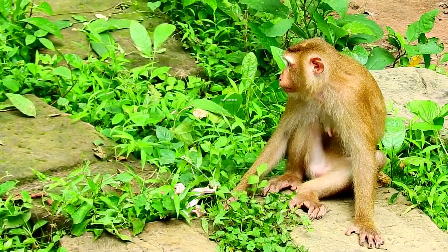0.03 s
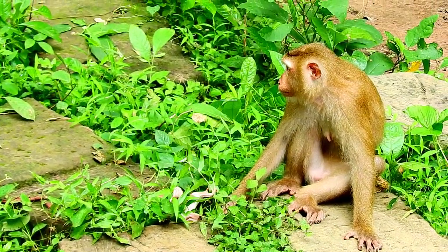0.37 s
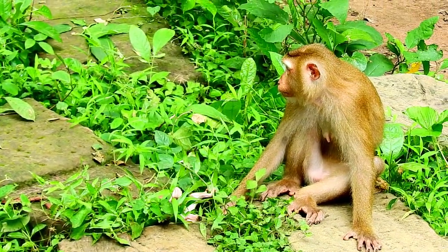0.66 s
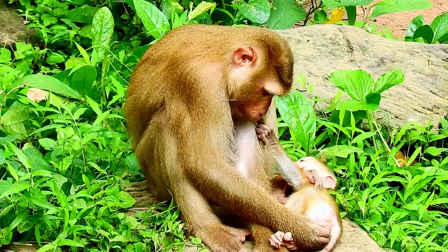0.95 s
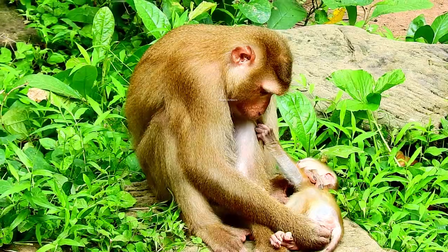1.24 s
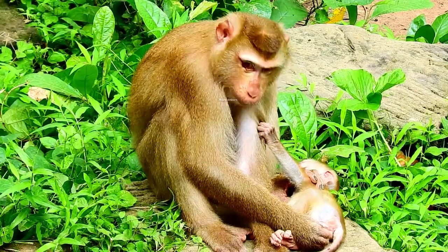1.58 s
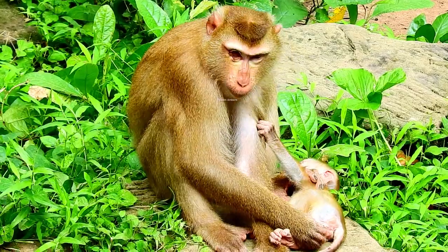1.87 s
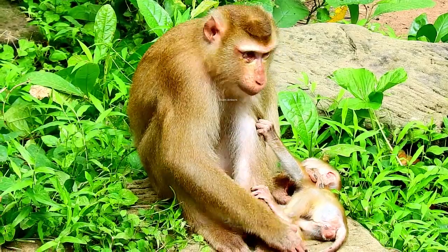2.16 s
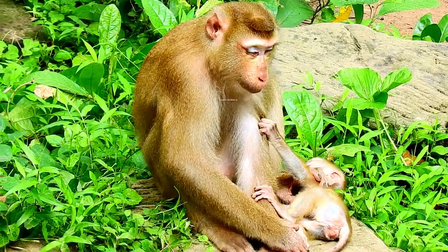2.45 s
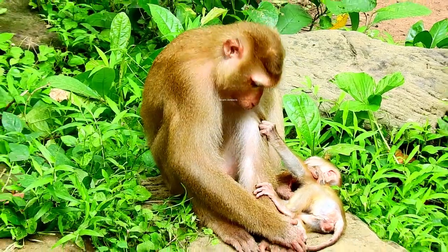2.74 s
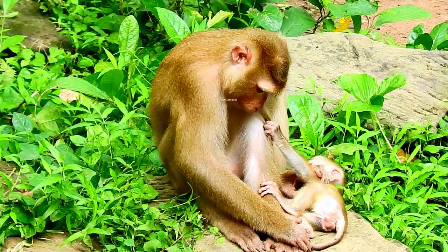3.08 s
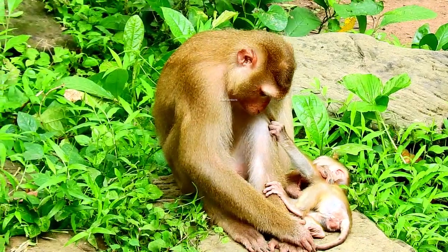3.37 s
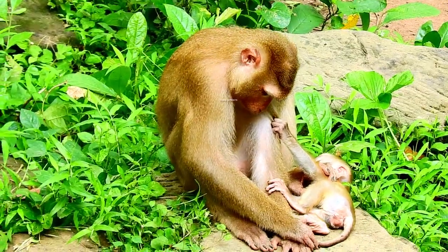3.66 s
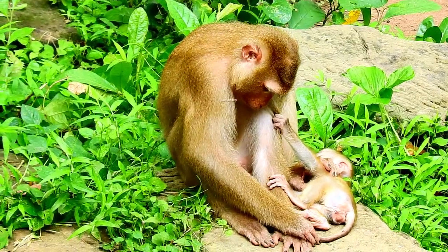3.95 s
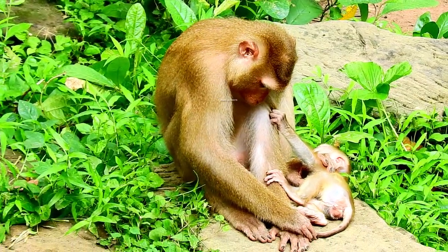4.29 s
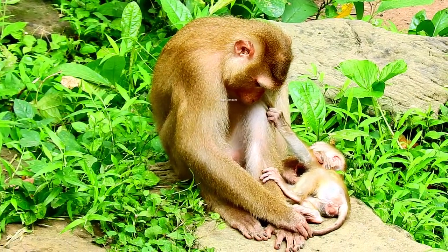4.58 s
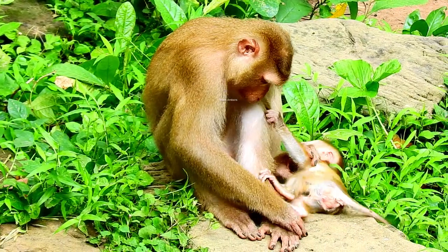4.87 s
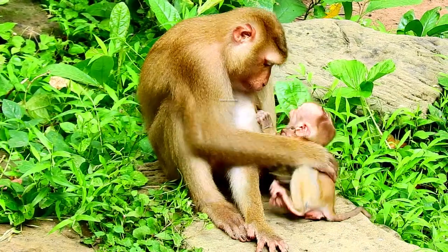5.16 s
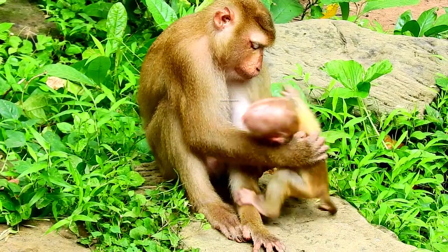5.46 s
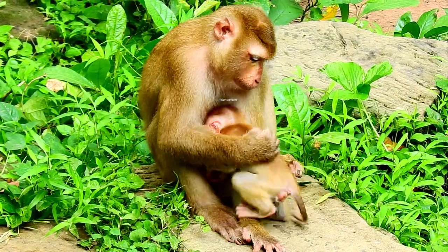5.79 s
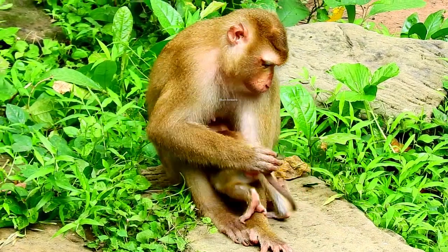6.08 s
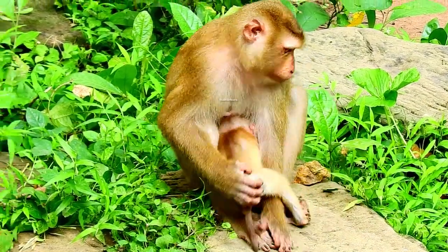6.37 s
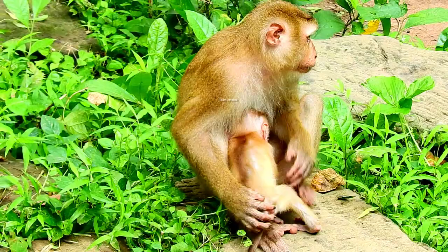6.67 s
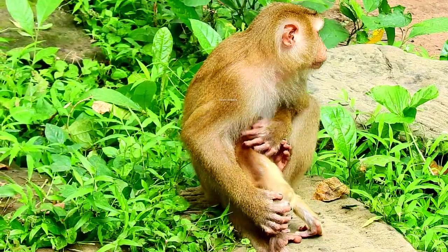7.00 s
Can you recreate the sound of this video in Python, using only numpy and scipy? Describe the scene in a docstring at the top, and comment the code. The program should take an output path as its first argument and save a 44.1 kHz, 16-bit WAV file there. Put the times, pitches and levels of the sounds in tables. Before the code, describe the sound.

Sharp chirps and soft whimpers from a young monkey build to hoarse screams and squeals over a steady outdoor hiss.

```python
"""Baby monkey in a clearing

Sharp chirps break into barks; soft grunts and a rising coo follow, then screams and two wails.
Vocal folds are the source and the throat is the filter: periodic vibration gives a whistle, irregular
pulses a rasp, and the screams flip between the two. Trees and stones scatter the calls over a steady
outdoor hiss. Early on, the sound cuts once from one spot to another."""
import sys
import numpy as np
from scipy import signal
from scipy.fft import rfft, irfft, next_fast_len
from scipy.io import wavfile
from scipy.ndimage import uniform_filter1d, minimum_filter1d, map_coordinates

SR = 44100
rng = np.random.default_rng(int(sys.argv[2]) if len(sys.argv) > 2 else 0)


def wav_record(signal):
    """Record a signal, one row per channel, as 16-bit PCM in the file named by sys.argv[1]."""
    frames = np.transpose(np.atleast_2d(signal))
    bounded = np.clip(frames, -1, 1)
    # unit amplitude maps onto the largest positive 16-bit level
    quanta = np.round(bounded * 32767).astype(np.int16)
    wavfile.write(sys.argv[1], SR, quanta)


N = 310023

# Spectrum of the outdoor background: f/Hz, relative level/dB
AIR_SPECTRUM = [(20, -50), (46, -10.5), (75, -11.5), (260, -15.5), (700, -22), (3500, -27), (6300, -28),
                (8000, -41), (11000, -47), (15500, -59)]
# Coherence of the background between the ears: f/Hz, left-right correlation
AIR_COHERENCE = [(100, 0.99), (4000, 0.8), (9000, 0.043)]
# Contours, one for each coo: t/s, pitch/Hz, level/dB, overtones re fundamental/dB
COO_CONTOURS = [
    [(0.0, 1080, -35.5, -11), (0.076, 1180, -43, -23), (0.11, 1147, -54.5, 3.5)],
    [(3.09, 780, -48.5, -10), (3.124, 1055, -36.5, -3), (3.194, 1029, -37, -6.5), (3.268, 1127, -29, -22),
     (3.334, 1166, -32, -22), (3.362, 1239, -31, -9.5), (3.384, 1490, -32.5, -11), (3.402, 1596, -34, 0),
     (3.464, 1576, -43, 9.5), (3.502, 1780, -52, 2), (3.552, 1824, -49, 6), (3.6, 1243, -49, -7)],
    [(5.04, 716, -52.5, -18), (5.15, 762, -51, -20)],
]
# Throat response in a coo: f/Hz, gain/dB
COO_TRACT = [(2200, -10.5), (3150, 7.5), (3300, -9), (4600, -10.5), (5500, -10), (6300, -14.5), (7500, -23),
             (9300, -29.5), (11000, -47)]
# Small sounds of the undergrowth: t/s, level/dB, centre/Hz, bandwidth/Hz, rise/s, decay/s
RUSTLE_EVENTS = [(0.341, -43.5, 5340, 940, 0.001, 0.015), (.71, -43.5, 1050, 1800, 0.04, 0.018),
                 (2.977, -44.5, 850, 700, 0.012, 0.012), (3.039, -36, 184, 13, 0.011, 0.021)]
# Chirps: t/s, duration/s, top pitch/Hz, level/dB, octave re fundamental/dB, roughness (0-1)
CHIRP_CALLS = [(0.791, 0.014, 3295, -18, 5, 0.21), (0.9677, 0.017, 3253, -19, 7.5, 0.24),
               (1.1994, 0.023, 3353, -23, 8, 0.14), (1.421, 0.019, 2916, -23, 7, 0.46)]
# Hoarse barks: t/s, duration/s, level/dB, mouth resonance/Hz
BARK_CALLS = [(0.982, 0.046, -23, 6200), (1.212, 0.04, -23, 5750), (1.424, 0.041, -23.5, 5660),
              (4.741, 0.14, -22.5, 5970)]
# Throat responses in a bark and in a growl: f/Hz, gain/dB
BARK_TRACT = [(1700, -15.5), (2400, 1.5), (3050, 10), (3650, -1), (4350, 10.5), (4950, 3.5), (5800, 9.5),
              (6800, -2), (7700, -7.5), (15000, -57)]
GROWL_TRACT = [(250, -11.5), (560, 3.5), (900, 1), (1300, 1.5), (1900, -9.5), (2600, 5)]
# Falling grunts: t/s, level/dB, duration/s, starting pitch/Hz
GRUNT_CALLS = [(2.255, -51, 0.028, 741), (2.465, -47.5, 0.051, 805), (2.716, -43, 0.052, 1138),
               (4.555, -42, 0.057, 1057)]
# Spectrum of the high hiss in the foliage: f/Hz, relative level/dB
LEAF_SPECTRUM = [(3000, -11), (5200, 1), (6600, 2), (8500, -13.5), (12000, -38)]
# Envelope of that hiss: t/s, level/dB
LEAF_ENVELOPE = [(2.45, -62.5), (2.78, -52), (3.2, -53.5), (3.8, -56), (4.7, -55.5)]
# Squeals within the screams: t/s, duration/s, starting pitch/Hz, final pitch/Hz, level/dB, swell/dB,
# octave re fundamental/dB, roughness (0-1)
SQUEAL_CALLS = [(4.742, 0.037, 3140, 2866, -27.5, 0, 1, 0.45),
                (4.783, 0.043, 2950, 3218, -26.5, 13, -35, 0.63),
                (4.997, 0.02, 4190, 4134, -21.5, 6, -21.5, 0.13),
                (5.013, 0.014, 5270, 4940, -26.5, 8, -14.5, 0.23),
                (5.028, 0.037, 4250, 3890, -23.5, -8, -31, 0.47),
                (5.061, 0.032, 4305, 4150, -23.5, -3, -22, 0.31),
                (5.295, 0.041, 4367, 4350, -23.5, -2, -16, 0.45),
                (5.335, 0.044, 5610, 4700, -29.5, 3, -8.5, 0.19),
                (5.409, 0.026, 4480, 4360, -30, -7, -6, 0.13),
                (5.499, 0.043, 4390, 4165, -24.5, -4.5, -14.5, 0.58),
                (5.544, 0.021, 4540, 4310, -25, 0, -16, 0.14),
                (5.649, 0.026, 4350, 4310, -32, 2, -11, 0.08), (5.71, 0.045, 4610, 3870, -35, 9, 0, 0.2),
                (6.306, 0.021, 4780, 3560, -26, -15, -39, 0.08)]
# Broad response and narrow formants of the tight throat in a scream: f/Hz, gain/dB
SCREAM_TRACT = [(1500, -7.5), (2600, -14.5), (3100, -2), (4250, 3), (6200, 1.5), (8800, -6.5), (10600, -6),
                (13300, -13), (15000, -48)]
SCREAM_FORMANTS = [(3050, -7.5), (4280, -1), (5150, 0.5), (6200, 3), (7150, -3)]
# Rasping bursts: peak t/s, rise/s, fall/s, level/dB, pulse rate/Hz, irregularity (0-1), mouth resonance/Hz
RASP_BURSTS = [(4.814, 0.0038, 0.0062, -23, 750, 0.86, 3600), (4.834, 0.013, 0.046, -28.5, 690, 0.6, 3880),
               (5.115, 0.043, 0.048, -24, 500, 0.72, 5040), (5.295, 0.022, 0.017, -21, 900, 0.29, 5270),
               (5.392, 0.017, 0.024, -21.5, 840, 0.48, 5090), (5.504, .008, 0.033, -21.5, 1110, 0.38, 5700),
               (5.631, 0.022, 0.014, -22.5, 740, 0.47, 4870), (5.709, 0.029, 0.011, -27.5, 690, 0.5, 5280),
               (5.778, 0.018, 0.02, -24.5, 960, 0.48, 6320), (5.811, 0.0028, 0.039, -24.5, 1020, 0.6, 5840),
               (5.853, 0.017, 0.034, -26, 950, 0.52, 6330), (5.897, 0.012, 0.068, -29, 1080, 0.52, 5320),
               (6.286, 0.04, 0.037, -32, 1370, 0.82, 5600), (6.302, 0.0096, 0.014, -29, 1560, 0.16, 5500)]
# The hoarse scream between the bursts: t/s, level/dB, mouth resonance/Hz
HOARSE_CONTOUR = [(5.028, -23.5, 4260), (5.23, -36, 5120), (5.6, -30, 5100), (5.74, -38.5, 5060),
                  (6.0, -41.5, 5100), (6.1, -39, 6270), (6.13, -45, 6000), (6.27, -44.5, 5060)]
# Contours of the two wails: t/s, pitch/Hz, level/dB
ARCHED_WAIL = [(6.597, 3080, -33), (6.603, 3160, -24.5), (6.609, 2870, -21), (6.627, 3120, -19.5),
               (6.649, 3363, -28.5), (6.685, 3464, -23.5), (6.715, 3284, -20.5), (6.725, 3176, -20),
               (6.735, 2760, -49)]
RISING_WAIL = [(6.916, 1907, -43), (6.932, 2067, -24.5), (6.955, 2375, -29), (6.982, 3000, -21.5),
               (7.0, 3230, -23.5), (7.03, 3294, -25)]
# Wails and where the voice cracks: contour, crack t/s, crack strength (0-1)
WAIL_CALLS = [(ARCHED_WAIL, 6.675, 0.11), (RISING_WAIL, 6.974, 1)]
# Throat response in a wail: f/Hz, gain/dB
WAIL_TRACT = [(2000, -11), (3100, 4), (4300, -15), (5900, 2), (6900, -1.5), (7700, -8), (10000, -36),
              (14000, -49)]
# Reverberation time among the trees: f/Hz, T60/s
TREE_REVERB = [(500, 0.097), (3200, 0.54), (6600, 0.56), (12000, 0.41)]

HOARSE_RATE_HZ, HOARSE_IRREGULARITY, CRACK_MOUTH_HZ = 850, .62, 5370


def amp(db):
    """Amplitude ratio of a level in decibels."""
    return 10 ** (np.asarray(db) / 20)


def unit(x):
    """Normalisation to an rms of 1."""
    return x / np.sqrt(np.mean(x ** 2) + 1e-20)


def steady(x, size=600):
    """Envelope flattening: the running rms over size samples is held at 1."""
    return x / np.sqrt(np.abs(uniform_filter1d(x ** 2, size)) + 1e-12)


def along(points, hz):
    """Interpolation of (f/Hz, value) points on a logarithmic frequency axis."""
    f, v = np.transpose(points)
    return np.interp(np.log(hz + 1), np.log(f + 1), v)


def curves(rows):
    """Linear interpolation of a contour: its start time, then each column sample by sample."""
    times, *columns = np.transpose(rows)
    t = times[0] + clock(times[-1] - times[0])[0]
    return [times[0]] + [np.interp(t, times, column) for column in columns]


def clock(length):
    """Time base of a sound: t in seconds and the elapsed fraction u."""
    t = np.arange(max(int(length * SR), 64)) / SR
    return t, t / t[-1]


def cycles(hz):
    """Phase in radians as the integral of frequency."""
    return 2 * np.pi * np.cumsum(hz) / SR


def wobble(n, rate):
    """Random modulation: a spline through rate Gaussian knots a second."""
    knots = rng.standard_normal(int(n * rate / SR) + 4)
    return map_coordinates(knots, [np.arange(n) * rate / SR])


def filtered(x, response):
    """Zero-phase filtering: the spectrum is multiplied by response(f)."""
    n = x.shape[-1]
    m = next_fast_len(n + SR // 8)
    return irfft(rfft(x, m) * response(np.fft.rfftfreq(m, 1 / SR)), m)[..., :n]


def muffled(x, edge_hz):
    """Steep low-pass filtering above edge_hz."""
    return filtered(x, lambda f: 1 / (1 + (f / edge_hz) ** 10))


def add(track, start, x, taper=30):
    """Superposition: x joins the track at start seconds, its ends ramped over taper samples."""
    i = max(round(start * SR), 0)
    k = np.arange(len(x))
    x = (x * np.minimum(1, np.minimum(k, k[::-1]) / taper))[:max(N - i, 0)]
    track[i:i + len(x)] += x


def air(spectrum, patchy_db):
    """Partly coherent noise, as of distant leaves and insects, shifting in time-frequency patches."""
    def mid_side_gains(f):
        angle = np.arccos(np.clip(along(AIR_COHERENCE, f), -1, 1)) / 2
        return amp(along(spectrum, f)) * np.array([np.cos(angle), np.sin(angle)])

    noise = signal.stft(rng.standard_normal((2, N)), nperseg=512)[2]
    patches = uniform_filter1d(rng.standard_normal(noise.shape[1:]), size=6, axis=0)
    patches = uniform_filter1d(patches, size=16, axis=1)
    pair = signal.istft(noise * amp(patchy_db * unit(patches)), nperseg=512)[1][:, :N]
    mid, side = filtered(pair, mid_side_gains)
    return unit(np.array([mid + side, mid - side]))


def coos(gain_db=2, break_s=3.38, break_width_s=0.0092, break_db=9):
    """Harmonics glide across the throat's resonances; jitter and shimmer grow as the voice weakens."""
    out = np.zeros(N)
    for contour in COO_CONTOURS:
        start, hz, db, overtones_db = curves(contour)
        n = len(hz)
        t = start + np.arange(n) / SR
        weak = np.clip((-40 - db) / 10, 0, 1)
        phase = cycles(hz * (1 + (.003 + .016 * weak) * wobble(n, 200)))
        falter_db = break_db * np.exp(-np.square((t - break_s) / break_width_s))  # at the register jump
        overtones = sum(amp(along(COO_TRACT, k * hz) + 2 * wobble(n, 35)) * np.sin(k * phase)
                        for k in range(2, 8))
        tone = np.sin(phase) + amp(overtones_db) * steady(overtones) / np.sqrt(2)
        shimmer_db = (.5 + 2 * weak) * wobble(n, 110)
        add(out, start, amp(db + gain_db - falter_db + shimmer_db) * tone, taper=200)
    return out


def rustles():
    """Exponentially damped noise bands: ticks, brushes and a dull thump in the plants."""
    out, t = np.zeros(N), np.arange(SR // 4) / SR
    for start, db, hz, width_hz, rise, decay in RUSTLE_EVENTS:
        envelope = np.minimum(t / rise, 1) * np.exp(-np.maximum(t - rise, 0) / decay)
        band = filtered(rng.standard_normal(len(t)), lambda f: 1 / (1 + (2 * (f - hz) / width_hz) ** 2))
        add(out, start, amp(db) * envelope * steady(band))
    return out


def strained(hz, rough, jitter=.059, shimmer_db=6):
    """Jitter and shimmer: the phase and gain of a tone that shakes with vocal strain."""
    phase = cycles(hz * (1 + jitter * rough * wobble(len(hz), 1064)))
    return phase, amp(shimmer_db * rough * wobble(len(hz), 634))


def whistle(hz, db, octave_db, rough, third_db=-19, edge_hz=9500):
    """Nearly periodic vibration of the folds gives a fundamental and two overtones."""
    phase, shimmer = strained(hz, rough)
    levels = [0, octave_db, third_db + octave_db / 2]
    tone = sum(amp(level) * np.sin(k * phase) / (1 + (k * hz / edge_hz) ** 4)
               for k, level in enumerate(levels, 1))
    return amp(db) * unit(tone * shimmer)


def chirps(scoop_depth=0.293, scoop_s=0.00336, punch_db=7, fade_db=7.5, snap_db=-13, snap_s=0.0012):
    """Onset transient: the folds part with a click and the pitch scoops up; rough chirps start softer."""
    out = np.zeros(N)
    for start, length, top_hz, db, octave_db, rough in CHIRP_CALLS:
        t, u = clock(length)
        clean = max(1 - 2 * rough, 0)
        scoop = clean * np.exp(-t / scoop_s)
        hz = top_hz * (1 - scoop_depth * scoop)
        attack = np.minimum(t / (rough * 0.0069 + 1e-4), 1)
        snap = clean * amp(db + snap_db) * np.exp(-t / snap_s) * rng.standard_normal(len(t))
        tone = whistle(hz, db - fade_db * u + punch_db * scoop, octave_db, rough)
        add(out, start, snap + attack * tone)
    return out


def pulses(rate, irregular, wander=.07, scatter=.12, shimmer_db=4.5, turbulence=.25):
    """Glottal source: the folds snap with uneven timing and size, each time releasing turbulent air."""
    n = len(rate)
    rate = rate * np.exp(wander * irregular * wobble(n, 220))
    turns = np.cumsum(rate) / SR
    at = np.flatnonzero(np.diff(np.floor(turns)))
    chance = rng.standard_normal((len(at), 2))
    when = at + scatter * irregular[at] ** 2 * chance[:, 0] * SR / rate[at]
    size = amp(shimmer_db * irregular[at] * chance[:, 1]) * np.sqrt(SR / rate[at])
    taps = np.floor(when)[:, None] + np.arange(-7, 9)
    impulses = size[:, None] * np.sinc(taps - when[:, None])  # band-limited, placed between samples
    train = np.bincount(np.clip(taps, 0, n - 1).astype(int).ravel(), impulses.ravel(), n)
    breath = turbulence * irregular * (1 + np.cos(2 * np.pi * turns)) * rng.standard_normal(n)
    return train + breath


def throat(x, response, size=2048):
    """Minimum-phase filter: the throat's stationary resonances ring on after each pulse."""
    cepstrum = irfft(np.log(amp(along(response, np.fft.rfftfreq(size, 1 / SR)))))
    k = np.arange(size)
    causal = cepstrum * np.where(k == 0, 1, 2) * (k < size / 2)
    return signal.fftconvolve(x, irfft(np.exp(rfft(causal))))[:len(x)]


def formant(x, centre_hz, width_hz):
    """A damped resonator that keeps ringing while its centre frequency moves."""
    carrier = np.exp(1j * cycles(centre_hz))
    pole = np.exp(-np.pi * width_hz / SR)
    return 2 * np.real(carrier * signal.lfilter([1 - pole], [1, -pole], x / carrier))


def barks(rate_hz=700, irregular=0.72, attack_s=0.0027, fade_db=16.5, growl_db=-20):
    """Ragged pulses excite the resonances of a wide-open throat, then fade into a low growl."""
    out = np.zeros(N)
    for start, length, db, mouth_hz in BARK_CALLS:
        t, u = clock(length)
        n = len(t)
        voice = throat(pulses(np.full(n, rate_hz), np.full(n, irregular)), BARK_TRACT)
        mouth = formant(voice, mouth_hz * (1 + .04 * wobble(n, 110)), width_hz=600)
        voice = muffled(.6 * voice + mouth, edge_hz=12000)
        envelope = amp(db - fade_db * u) * np.minimum(t / attack_s, 1)
        add(out, start, envelope * steady(voice, size=300))
        add(out, start + 0.27 * length, amp(db + growl_db) * growl(length=.072, hz=698, edge_hz=3500))
    return out


def growl(length, hz, edge_hz, rest_hz=520):
    """Ragged pulses grow more periodic as they sink to a resting pitch; the lips act as a low-pass."""
    _, u = clock(length)
    folds = pulses(hz * (rest_hz / hz) ** u, irregular=.8 - .4 * u)
    voice = muffled(throat(folds, GROWL_TRACT), edge_hz)
    return steady(voice) * unit(u ** 0.12 * (1 - u))


def grunts():
    """Low-pass filtering by a closed mouth turns short growls into coarse whimpers."""
    out = np.zeros(N)
    for start, db, length, hz in GRUNT_CALLS:
        add(out, start, amp(db) * growl(length, hz, edge_hz=1600))
    return out


def leaf_hiss():
    """Amplitude-modulated noise: a high hiss in the foliage swells, then eases."""
    db = np.interp(np.arange(N) / SR, *np.transpose(LEAF_ENVELOPE))
    return amp(db) * air(LEAF_SPECTRUM, patchy_db=3.5)


def squeals(glide_ease=1.714, rasp_db=-5):
    """Change of vibratory regime: the scream flips into a gliding whistle, with rasp breaking through."""
    out = np.zeros(N)
    for start, length, from_hz, to_hz, db, swell_db, octave_db, rough in SQUEAL_CALLS:
        t, u = clock(length)
        glide_hz = to_hz + (from_hz - to_hz) * (1 - u) ** glide_ease
        hz = glide_hz * (1 + .03 * rough * wobble(len(t), 170))
        level = db + swell_db * (u - .5)
        tone = whistle(hz, level, octave_db, rough)
        hoarse = rasp(level + rasp_db, HOARSE_RATE_HZ, HOARSE_IRREGULARITY, CRACK_MOUTH_HZ)
        add(out, start, tone + rough * hoarse)
    return out


def rasp(db, rate, irregular, mouth_hz, mouth_db=9, mouth_width_hz=800, pull=.85):
    """Fast pulses ring narrow, wavering formants; the mouth boosts the nearest and draws it along."""
    n = len(db)
    source = throat(pulses(np.full(n, rate), np.full(n, irregular)), SCREAM_TRACT)
    voice = np.zeros(n)
    for hz, gain_db in SCREAM_FORMANTS:
        near = np.exp(-np.square((hz - mouth_hz) / mouth_width_hz))
        centre_hz = (hz + pull * near * (mouth_hz - hz)) * (1 + .035 * wobble(n, 70))
        flare_db = 4 * wobble(n, 100)
        voice += amp(gain_db + mouth_db * near + flare_db) * formant(source, centre_hz, width_hz=230)
    tremble_db = 1.5 * irregular * wobble(n, 180)
    return amp(db + tremble_db) * steady(voice)


def screams(sag_per_s=0.8, yield_db=-27):
    """Alternating regimes: squeals and rasps of sagging pulse rate; a hoarse scream fills the gaps."""
    lead, hoarse = squeals(), np.zeros(N)
    for peak, rise, fall, db, rate, irregular, mouth_hz in RASP_BURSTS:
        t = clock(2 * (rise + fall))[0] - 2 * rise
        swell_db = -10 * np.square(t / np.where(t < 0, rise, fall))
        burst = rasp(db + swell_db, rate * np.exp(-sag_per_s * t), irregular, mouth_hz)
        add(lead, peak - 2 * rise, burst)
    start, db, mouth_hz = curves(HOARSE_CONTOUR)
    add(hoarse, start, rasp(db, HOARSE_RATE_HZ, HOARSE_IRREGULARITY, mouth_hz))
    lead_power = uniform_filter1d(np.square(lead / amp(yield_db)), size=300)
    return lead + hoarse / (1 + lead_power)  # gives way to anything louder than yield_db


def wails(crack_width_s=0.012, rasp_db=-3):
    """Four harmonics sweep the throat's resonances; periodicity falters briefly as the voice cracks."""
    out = np.zeros(N)
    for contour, crack_s, strength in WAIL_CALLS:
        start, hz, db = curves(contour)
        t = start + np.arange(len(hz)) / SR
        crack = strength * np.exp(-np.square((t - crack_s) / crack_width_s))
        phase, shimmer = strained(hz, rough=.07 + crack / 2)
        tone = steady(sum(amp(along(WAIL_TRACT, k * hz)) * np.sin(k * phase) for k in range(1, 5)))
        hoarse = rasp(db + rasp_db, HOARSE_RATE_HZ, HOARSE_IRREGULARITY, CRACK_MOUTH_HZ)
        add(out, start, amp(db) * shimmer * tone + crack * muffled(hoarse, edge_hz=9000))
    return out


def clearing(x, wet_db, side_db=-2, build_s=0.00075, near_db=-11):
    """Scattering: stones and trees add a decaying tail; near leaves make the treble differ by ear."""
    hz, t, noise = signal.stft(rng.standard_normal((2, SR * 2 // 3)), SR, nperseg=256)
    decay = amp(-60 * t / along(TREE_REVERB, hz)[:, None])
    mid, side = signal.istft(noise * decay * (1 - np.exp(-t / build_s)), SR, nperseg=256)[1]
    tail = np.array([mid + amp(side_db) * side, mid - amp(side_db) * side])
    far = amp(wet_db) * signal.fftconvolve(x[None], tail / np.linalg.norm(tail[0]), axes=1)[:, :N]
    treble = signal.butter(2, (5500, 9500), "bandpass", fs=SR)
    leaves = signal.lfilter(*treble, rng.standard_normal(SR // 200))
    near = amp(near_db) * signal.fftconvolve(x, leaves / np.linalg.norm(leaves))[:N]
    return x + np.array([near, -near]) + far


def scene(first_end_s=.856, second_start_s=.868, first_air_db=-48.5, second_air_db=-51):
    """Superposition at two spots parted by a short silence; the second opens on the echo of a chirp."""
    t = np.arange(N) / SR
    soft = clearing(coos() + grunts() + rustles(), wet_db=-9.5)
    cries = clearing(chirps() + barks() + screams() + wails(), wet_db=-8.0)
    dull_air = filtered(air(AIR_SPECTRUM, patchy_db=1.9), lambda f: 0.38 + 0.63 / (1 + (f / 6600) ** 10))
    pan = lambda left_db: amp([[left_db], [-left_db]])
    gate = lambda on: uniform_filter1d(on.astype(float), size=130)
    first = soft * pan(-1.3) + amp(first_air_db) * dull_air
    second = soft * pan(1.2) + cries + leaf_hiss() + amp(second_air_db) * air(AIR_SPECTRUM, patchy_db=1.0)
    return first * gate(t < first_end_s) + second * gate(t > second_start_s)


def record(dry, ceiling=.32, top_hz=15700):
    """Peak limiting and band limiting: a fast gain holds the peaks down; nothing above top_hz passes."""
    needed = np.minimum(1, ceiling / (np.abs(dry).max(axis=0) + 1e-9))
    gain = uniform_filter1d(minimum_filter1d(needed, size=130), size=130)
    return filtered(dry * gain, lambda hz: hz < top_hz)


dry = scene()
out = record(dry)
wav_record(out)
```